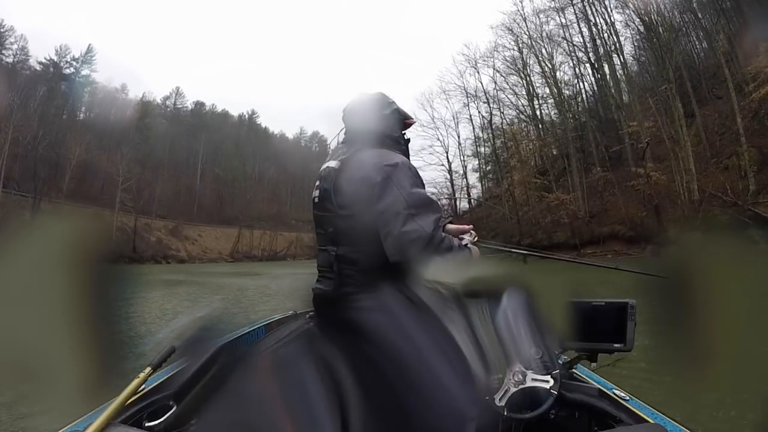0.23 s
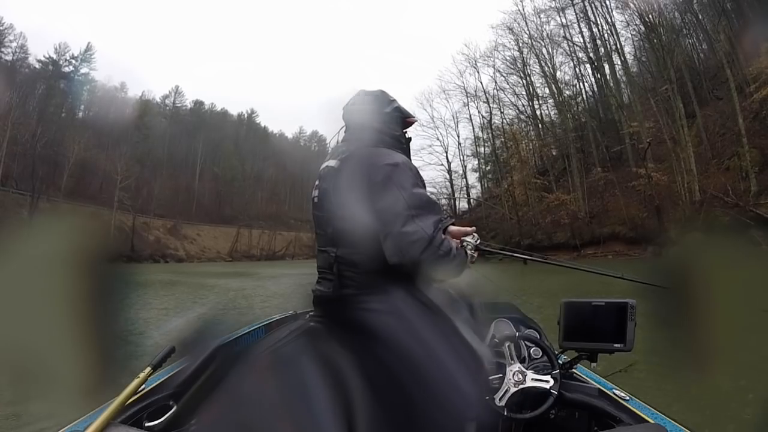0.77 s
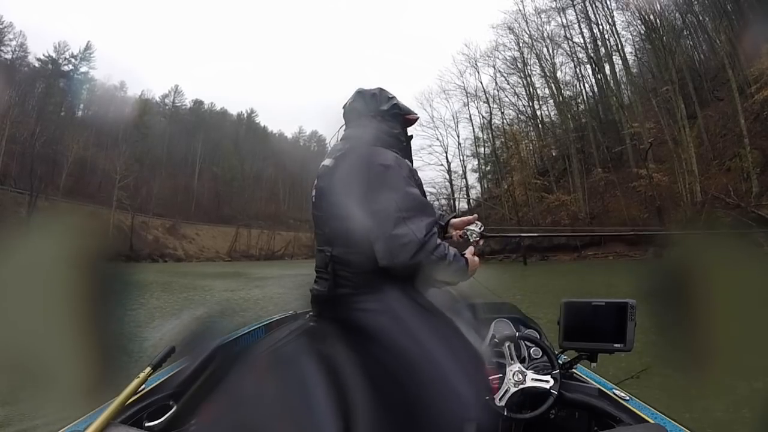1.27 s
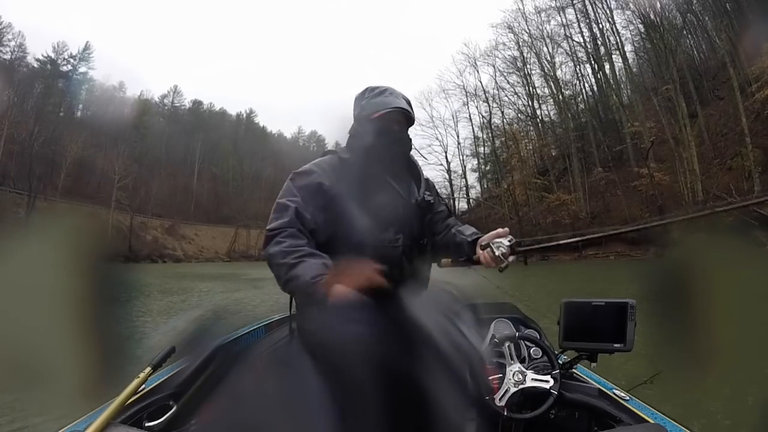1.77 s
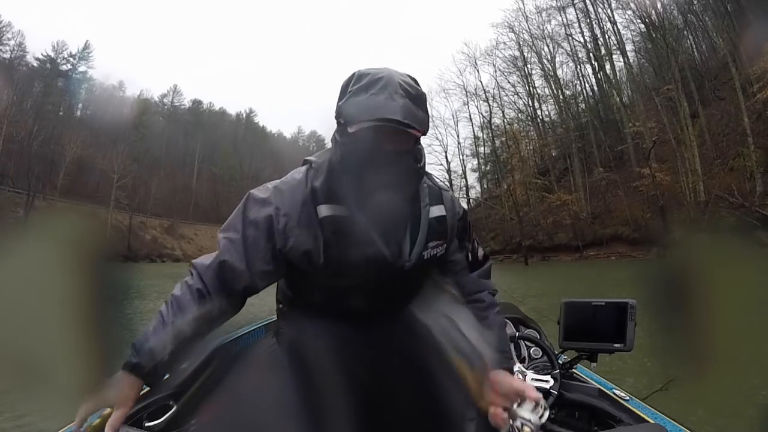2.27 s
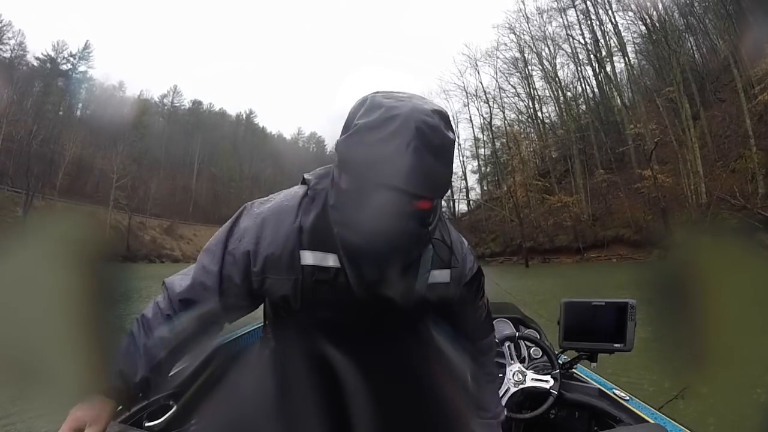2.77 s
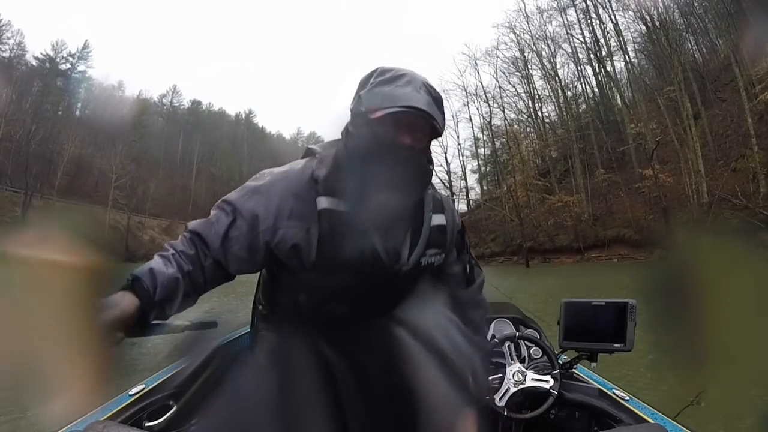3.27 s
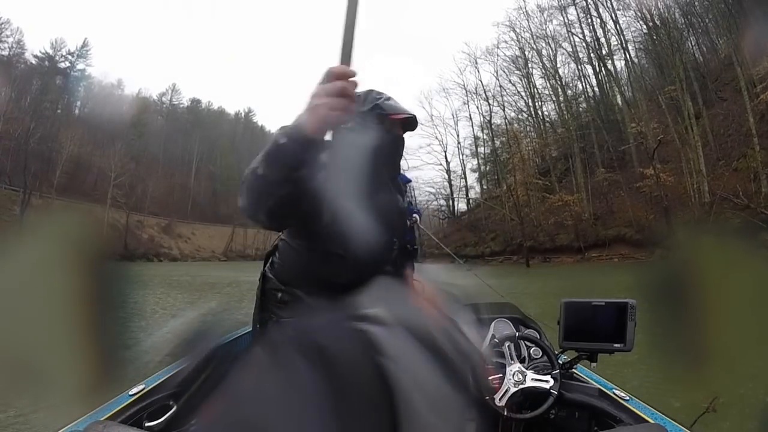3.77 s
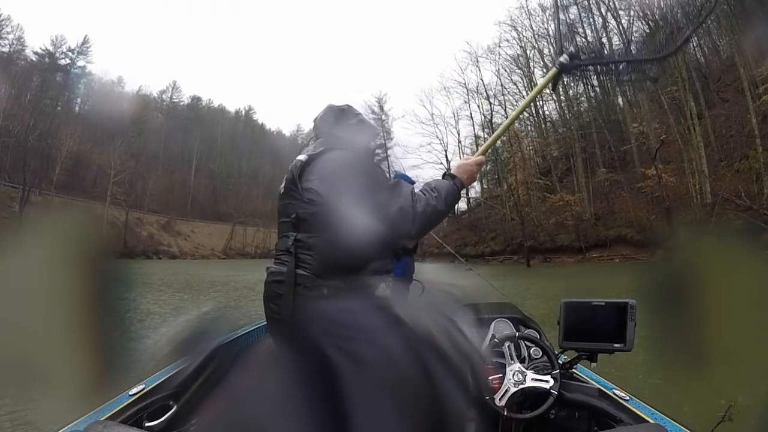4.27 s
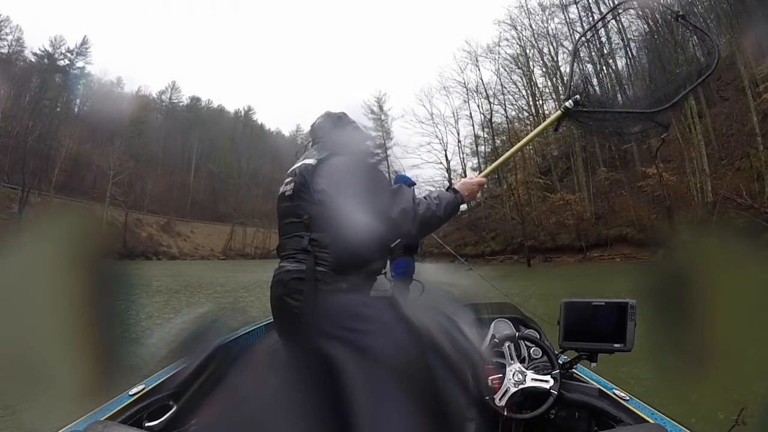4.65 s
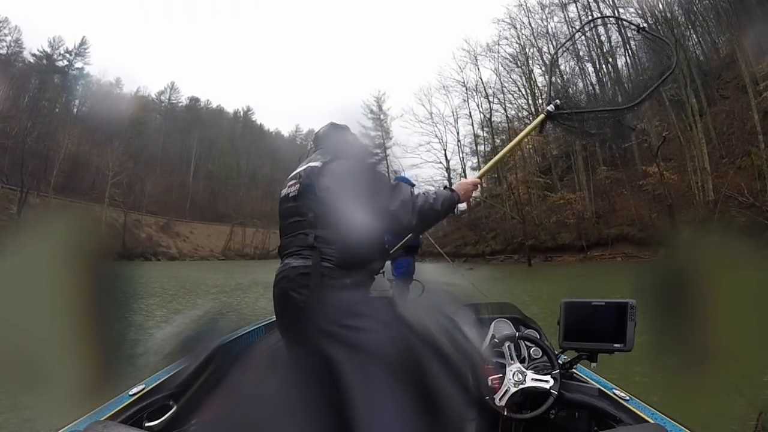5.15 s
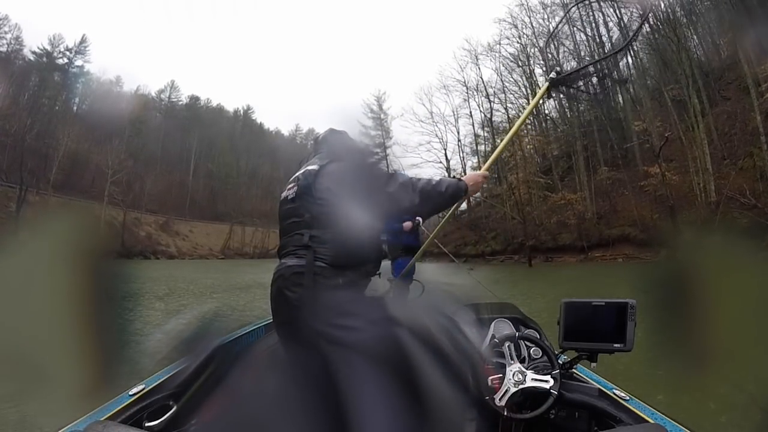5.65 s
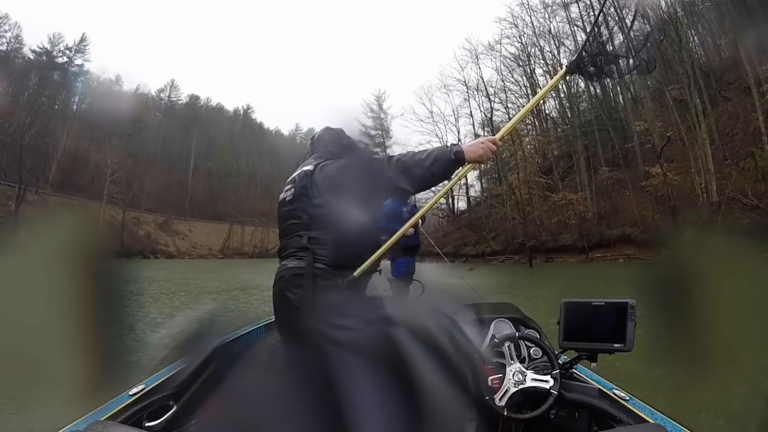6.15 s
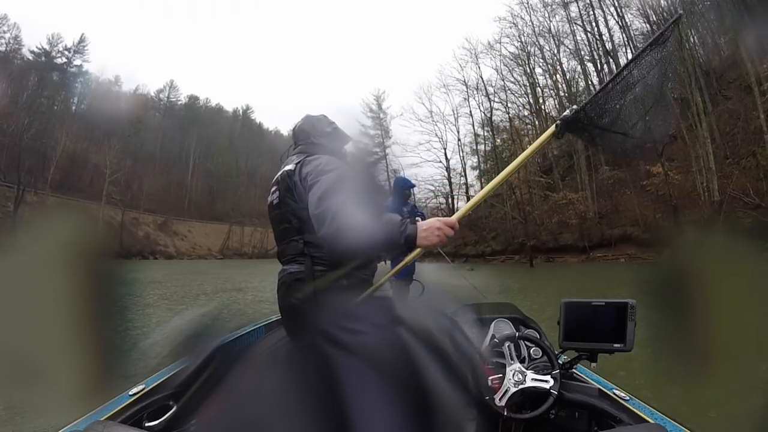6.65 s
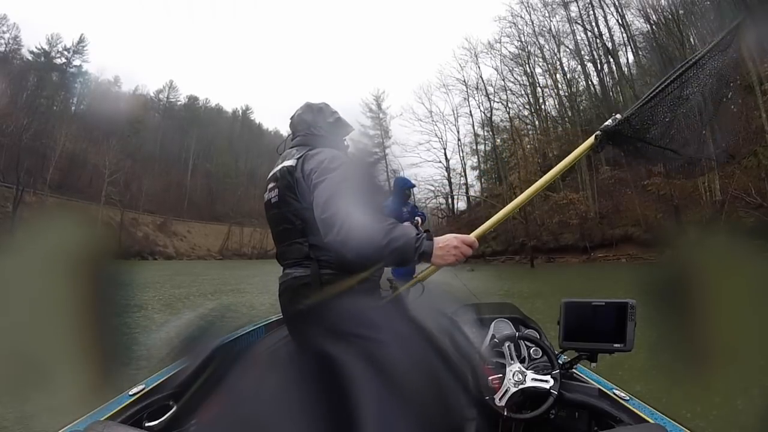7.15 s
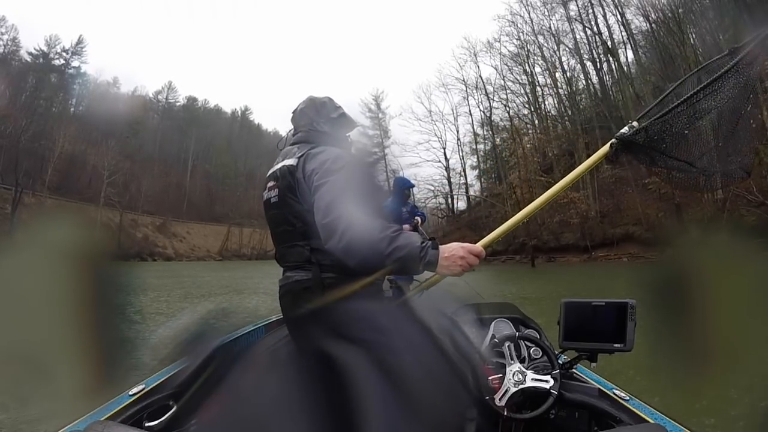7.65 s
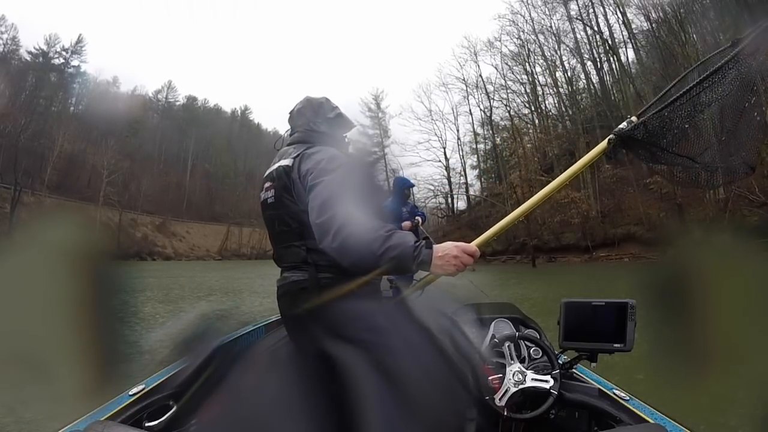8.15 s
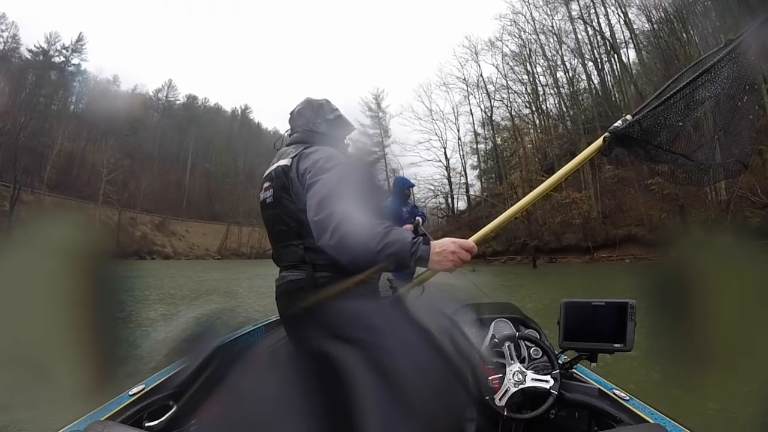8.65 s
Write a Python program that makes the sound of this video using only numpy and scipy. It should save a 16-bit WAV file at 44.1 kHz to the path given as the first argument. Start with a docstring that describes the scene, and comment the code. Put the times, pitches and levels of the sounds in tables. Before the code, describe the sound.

Heard from inside a plastic case on a small fishing boat: an even, muffled hiss of rain on water with dull fine ticking. One very loud drop pops on the case at about 1.5 seconds. Near 2.6 a metal net handle clinks, then thumps and rattles off the deck just after 3. A nylon jacket rustles, and afterwards close drops tap ever more often.

```python
"""A fishing boat on a lake in the rain, heard from a camera in a plastic case on board.
The rain is shaped noise under random ticks; drops on the case and the deck fittings are damped modes and spray.
Bubbles chirp at the hull, a nylon jacket swishes as swelling noise, and blows excite the modes of the hull.
A landing net is pulled off the deck: noisy contacts of its metal handle drive a bank of resonances.
Faint steady tones come from the camera, whose gain control ducks at the hardest drop."""
import sys
import numpy as np
from scipy import signal
from scipy.fft import rfft, irfft, next_fast_len
from scipy.io import wavfile
from scipy.ndimage import uniform_filter1d, minimum_filter1d, map_coordinates

SR = 44100
rng = np.random.default_rng(int(sys.argv[2]) if len(sys.argv) > 2 else 0)


def transcribe(signal):
    """Save signal, clipped to [-1, 1], as a 16-bit WAV file at the path in sys.argv[1]."""
    frames = np.atleast_2d(signal).T
    limited = np.clip(frames, -1, 1)
    pcm = np.round(limited * 32767).astype(np.int16)
    wavfile.write(sys.argv[1], SR, pcm)


N = 392931


def amp(db):
    """Logarithmic level: decibels to an amplitude factor."""
    return 10 ** (np.asarray(db) / 20)


def unit(x):
    """Mean power: x scaled to rms 1."""
    return x / np.sqrt(np.mean(x ** 2) + 1e-20)


def burst(x):
    """Equal energy: x scaled to the energy of 5 ms at rms 1."""
    return x * np.sqrt(0.005 * SR / (np.sum(x ** 2) + 1e-20))


def wobble(rate_hz):
    """Band-limited fluctuation: a smooth curve through rate_hz random knots a second."""
    knots = rng.standard_normal(int(N * rate_hz / SR) + 4)
    return map_coordinates(knots, [np.arange(N) * rate_hz / SR])


def filtered(x, response):
    """Linear filtering: the spectrum of x times a response given as a function of frequency."""
    size = next_fast_len(len(x) + 8192)
    spectrum = rfft(x, size) * response(np.fft.rfftfreq(size, 1 / SR))
    return irfft(spectrum, size)[:len(x)]


def coloured(x, colour):
    """Spectral shaping: x filtered by (frequency [Hz], level [dB]) points, then scaled to rms 1."""
    points_hz, db = np.transpose(colour)
    return unit(filtered(x, lambda hz: amp(np.interp(np.log(hz + 1), np.log(points_hz), db))))


def noise(colour, size):
    """Stationary random sound: coloured Gaussian noise of rms 1."""
    return coloured(rng.standard_normal(size), colour)


def fade(t, t60):
    """Free exponential decay: down 60 dB after t60 seconds."""
    return np.exp(-np.log(1000) * t / t60)


def ring(modes, t, scatter_db):
    """Modal superposition: damped sines of random strength, alternate modes in opposite polarity."""
    total = np.zeros(len(t))
    for k, (hz, db, t60) in enumerate(modes):
        strength = amp(db + scatter_db * rng.standard_normal())
        total += (-1) ** k * strength * np.sin(2 * np.pi * hz * t) * fade(t, t60)
    return total


def add(track, s, sound):
    """Superposition: mix a sound into the track at time s."""
    part = track[max(round(s * SR), 0):][:len(sound)]
    part += sound[:len(part)]


# spectrum of rain on the lake, through the case: (frequency [Hz], relative level per Hz [dB])
LAKE_SPECTRUM = [(20, -5.5), (45, -3), (130, -4.5), (205, -8.5), (260, -4.5), (300, -4), (390, 3.5),
                 (550, -9.5), (800, -11), (980, -19), (1170, -12.5), (1430, -21), (2000, -15),
                 (2900, -13.5), (3400, -18), (4000, -19), (5000, -32), (8000, -37), (12000, -42.5),
                 (15000, -48), (16000, -70)]


def lake(rain_db=-49, swell_db=0.12, flutter_db=0.9):
    """Incoherent summation: countless far drops merge into noise with slow swells and quick flutter."""
    level_db = rain_db + swell_db * wobble(0.83) + flutter_db * wobble(24)
    return amp(level_db) * noise(LAKE_SPECTRUM, N)


# spectrum of small drops, through the case: (frequency [Hz], relative level per Hz [dB])
TICK_SPECTRUM = [(150, -9), (400, 2), (800, 2), (1200, 4.5), (1450, -11.5), (2000, -4), (2900, -1),
                 (4500, -15.5), (11000, -36.5), (16000, -50)]


def patter(level_db=-55, spread_db=3.0, t60=0.027, count=480):
    """Random impulses: small drops tick dully on the boat and the water beside it, few of them loud."""
    out, t = np.zeros(N), np.arange(SR // 25) / SR
    for when, size in rng.random((count, 2)):
        tick = burst(rng.standard_normal(len(t)) * fade(t, t60))
        add(out, when * N / SR, amp(level_db - spread_db * np.log(size + 0.015)) * tick)
    return np.std(out) * coloured(out, TICK_SPECTRUM)  # the colour leaves the overall level unchanged


# faint steady tones of the camera: (frequency [Hz], rms level [dB])
WHINE_TONES = [(258, -63.5), (642, -68.5), (7600, -86), (12048, -88.5)]


def whine():
    """Sinusoidal emission: the camera's electronics hum and whistle, their phases wandering a little."""
    t, out = np.arange(N) / SR, np.zeros(N)
    for hz, db in WHINE_TONES:
        phase = 2 * np.pi * hz * t + 0.5 * wobble(5)
        out += amp(db) * np.sqrt(2) * np.sin(phase)
    return out


# modes of the whole case, shared by all drops: (frequency [Hz], relative level [dB], t60 [s])
CASE_MODES = [(317, -26, 0.058), (430, -26, 0.013), (650, -37, 0.016), (1350, -17.5, 0.014),
              (1907, -33.5, 0.046), (2160, -32, 0.021), (2344, -20, 0.02), (2863, -19, 0.015),
              (3935, -30.5, 0.02)]
# spectrum of the spray of a bursting drop: (frequency [Hz], relative level per Hz [dB])
SPLASH_SPECTRUM = [(100, -40), (500, -1), (2500, 2), (3600, 8), (4700, 0), (6000, -0.5), (8500, -8),
                   (11000, -20), (15000, -29), (17000, -57)]
# modes near the pitch of the struck spot ring more strongly
NEAR_MODE_DB, NEAR_MODE_OCTAVES = 8.5, 0.3
# the film of water shifts the modes from drop to drop: standard deviation [octaves]
WET_DETUNE_OCTAVES = 0.043


def case_modes(spot_hz):
    """Mode coupling: modes near the pitch of the struck spot are favoured and all are slightly detuned."""
    modes = []
    for hz, db, t60 in CASE_MODES:
        nearness = np.exp(-(np.log2(hz / spot_hz) / NEAR_MODE_OCTAVES) ** 2)
        wet_hz = hz * 2 ** (WET_DETUNE_OCTAVES * rng.standard_normal())
        modes.append((wet_hz, db + NEAR_MODE_DB * nearness, t60))
    return modes


def drop(hz, t60, tilt_db, edge_hz=1100, soft_hz=3300, case_db=-2.5, contact=0.0014, wall_share=0.39,
         spray_t60=0.0048, mist_db=-20, mist_t60=0.013):
    """Impact excitation: a drop makes the case wall ring (pock) and bursts into noise (spray)."""
    t = np.arange(SR // 16) / SR
    flatten = 1 - fade(t, contact)  # the drop takes a moment to flatten
    spot = np.sin(2 * np.pi * hz * t) * fade(t, t60) * flatten
    # the small stiff wall passes little below its first resonance, the soft drop little above a few kHz
    band = signal.butter(2, [edge_hz, max(hz, soft_hz)], "bandpass", fs=SR, output="sos")
    spot = signal.sosfilt(band, spot)
    pock = spot + amp(case_db) * ring(case_modes(hz), t, scatter_db=3) * flatten
    # the blow also runs around the case and arrives again a moment later, by a new path each time
    late = rng.uniform(0.00121, 0.00196)
    pock = burst(pock + wall_share * np.interp(t - late, t, pock, left=0))
    # a sharp burst, then a brief fizz of fine droplets; the tilt acts above 4 kHz
    colour = [(f, db + tilt_db * np.log2(max(f / 4000, 1))) for f, db in SPLASH_SPECTRUM]
    spray_decay = fade(t, spray_t60) + amp(mist_db) * fade(t, mist_t60)
    spray = burst(noise(colour, len(t)) * spray_decay * flatten)
    return pock, spray


# drops on the case: (time [s], pock level over 5 ms [dB], pitch of the struck spot [Hz],
# spray level over 5 ms [dB], spray tilt above 4 kHz [dB per octave])
CASE_DROPS = [(.158,-37,1730,-41.5,-3), (.243,-25.5,2230,-43.5,5), (1.566,-2.5,2298,-17,8.5),
              (1.7634,-42.5,2380,-38,8.5), (2.2258,-38,1930,-50.5,2), (2.4473,-46,2600,-30.5,-1.5),
              (2.469,-22.5,1740,-65,-8), (2.51,-31,1910,-40.5,5), (2.9093,-12.5,2336,-25.5,1),
              (2.933,-35.5,2080,-40,-7), (3.9641,-23,2130,-35.5,-4.5), (4.726,-37,1690,-40,-25),
              (4.8895,-32.5,2150,-44.5,-3), (5.2862,-38,2200,-46,1), (5.6785,-30.5,1830,-44.5,-1),
              (6.1031,-16.5,1680,-25.5,-4.5), (6.264,-28,1770,-47,9), (6.5103,-21.5,1920,-38,-4),
              (6.6396,-18.5,2230,-24.5,-0.5), (6.674,-30,2270,-46.5,7), (6.89,-13,2020,-20.5,5),
              (6.962,-44,2600,-43.5,-8), (7.4466,-11.5,1850,-33,8), (7.581,-14.5,1970,-34,7),
              (7.6104,-52,5800,-51,-5), (7.6636,-43.5,1290,-48.5,13), (7.728,-25.5,1930,-32,-8),
              (8.0842,-22,1760,-51,12), (8.2279,-29.5,2000,-27,0), (8.2306,-23,5740,-41,0),
              (8.239,-36,5600,-55,0), (8.2493,-29,1950,-26.5,-3), (8.2707,-49,2820,-44,-5),
              (8.528,-22,1710,-27.5,-12)]
# the wall rings longest when struck near its main resonance: (pitch of the spot [Hz], t60 [s])
SPOT_DECAY = [(1600, .005), (2000, 0.006), (2350, 0.013), (5800, 0.0074)]


def near_drops():
    """Local resonance: big drops hit the case, each at a spot whose pitch sets how long it rings."""
    out = np.zeros(N)
    for s, pock_db, hz, spray_db, tilt_db in CASE_DROPS:
        t60 = np.interp(hz, *np.transpose(SPOT_DECAY))
        pock, spray = drop(hz, t60, tilt_db)
        add(out, s, amp(pock_db) * pock + amp(spray_db) * spray)
    return out


def stray_drops(count=9, level_db=-47.5, spread_db=3, low_hz=1410, high_hz=2600):
    """Random arrivals: faint drops on the fittings, as (time [s], level [dB], centre [Hz])."""
    drops = []
    for when, size, spot in rng.random((count, 3)):
        db = level_db + spread_db * (2 * size - 1)
        drops.append((when * N / SR, db, low_hz * (high_hz / low_hz) ** spot))
    return drops


# drops on the deck fittings: (time [s], ringing level over 5 ms [dB], centre of the strongest ringing [Hz])
FITTING_DROPS = [(0.2073,-42.5,1200), (1.406,-43.5,1940), (2.051,-28,2670), (2.162,-32.5,1600),
                 (2.2873,-39,1390), (2.5735,-40.5,2780), (4.022,-38.5,2170), (4.1123,-37.5,1320),
                 (4.158,-33,2340), (5.4254,-44,1800), (5.496,-37.5,1630), (5.821,-30.5,2720),
                 (5.8337,-33.5,2800), (7.795,-41.5,1610), (8.3222,-33,2170), (8.866,-39.5,1900)]
# modes of the fittings: (frequency [Hz], relative level [dB], t60 [s])
FITTING_MODES = [(795, 6, 0.056), (1160, 10.5, 0.017), (1575, -4, 0.022), (1910, 4, 0.018),
                 (2320, 12, 0.0046), (2833, 2.5, 0.022)]


def deck_drops(focus_db=18, spray_db=-25, spray_t60=0.0047):
    """Selective modal excitation: a fitting rings most strongly near the centre of each drop."""
    out, t = np.zeros(N), np.arange(SR // 16) / SR
    for s, level_db, centre in [*FITTING_DROPS, *stray_drops()]:
        # focus_db is lost for each octave away from the centre
        modes = [(hz, db - focus_db * abs(np.log2(hz / centre)), t60) for hz, db, t60 in FITTING_MODES]
        plink = burst(ring(modes, t, scatter_db=2) * (1 - fade(t, 0.011)))
        spray = burst(noise(SPLASH_SPECTRUM, len(t)) * fade(t, spray_t60))
        add(out, s, amp(level_db) * (plink + amp(spray_db) * spray))
    return out


# wavelets lapping at the hull: (time [s], relative level [dB], middle bubble pitch at the start [Hz])
WAVELETS = [(.26, -53, 800), (.89, -41.5, 680), (.905, -49, 930), (1.2, -45, 770), (2.035, -42, 1096),
            (3.042, -40, 406), (6.02, -52, 646)]


def lapping(level_db=-3.5, rise=0.83, t60=0.019, spread=0.02, count=3):
    """Bubble resonance: each wavelet traps a few bubbles, whose pitch rises as they surface."""
    out, t = np.zeros(N), np.arange(SR // 10) / SR
    for s, db, hz in WAVELETS:
        for delay, size in rng.random((count, 2)):
            bubble_hz = hz * 2 ** (0.55 * (size - 0.5))
            phase = 2 * np.pi * bubble_hz * (t + rise * t * t)
            bubble = burst(np.sin(phase) * fade(t, t60) * (1 - fade(t, 0.008)))
            add(out, s + spread * delay, amp(db + level_db) * bubble)
    return out


# strokes of the rain jacket: (time of the peak [s], rise [s], fall [s],
# relative level of the cloth's flap [dB], relative level of its surface hiss [dB])
STROKES = [(1.4, 0.78, 0.4, -60, -65), (2.75, 0.85, 1.2, -49, -67.5), (4.07, 0.91, 0.57, -50.5, -66),
           (4.66, 0.23, .28, -59, -52.5), (4.745, 0.15, 0.12, -40.5, -55), (5.148, 0.0065, 0.027, -52, -43),
           (5.6, .4, 0.56, -58, -62), (6.86, .08, 0.18, -47, -61.5)]
# spectrum of flapping cloth: (frequency [Hz], relative level per Hz [dB])
FLAP_SPECTRUM = [(100, -14), (280, 4), (750, -5), (1400, -23.5), (3000, -10), (6000, -48)]
# spectrum of sliding nylon: (frequency [Hz], relative level per Hz [dB])
NYLON_SPECTRUM = [(1000, -8), (3000, 12.5), (5000, -3), (7200, -2.5), (8800, -12), (12000, -16),
                  (15000, -33)]


def jacket(crinkle_db=2.0, depth_db=20):
    """Friction noise: wet nylon flaps and slides, each stroke gaining and losing depth_db per rise and fall."""
    t, flap, hiss = np.arange(N) / SR, 0, 0
    for s, rise, fall, flap_db, hiss_db in STROKES:
        stroke_db = -depth_db * np.maximum((s - t) / rise, (t - s) / fall)
        # strokes that overlap add in power
        flap = np.hypot(flap, amp(flap_db + stroke_db))
        hiss = np.hypot(hiss, amp(hiss_db + stroke_db))
    cloth = flap * noise(FLAP_SPECTRUM, N) + hiss * noise(NYLON_SPECTRUM, N)
    return amp(crinkle_db * wobble(70)) * cloth


# blows on the hull and deck: (time [s], relative level [dB], hardness [0 booms, 1 knocks, 2 clacks])
BLOWS = [(1.4515, -27, 1.85), (2.645, -36.5, 1.7), (2.691, -41, .9), (2.73, -38, 0.88), (3.137, -16, 0.4),
         (3.139, -30.5, 2.3), (3.171, -31, 0), (3.199, -33, 0.001), (3.291, -38, 0.47), (3.363, -40, 1.1),
         (3.403, -35, 1.27), (3.484, -40, 1.25), (3.582, -31, 0.073), (3.623, -40, .8), (3.932, -39, 0.62),
         (4.113, -42, 0), (4.14, -41.5, 1.34)]
# hull modes in three groups, deep to hard: (frequency [Hz], relative level [dB], t60 [s])
BOOM_MODES = [(48.3, -10, 0.049), (73, -2, 0.053), (97, 2, 0.038), (102.2, 0, 0.063)]
KNOCK_MODES = [(209, -2.5, 0.058), (247, -1, 0.06), (293, -1, 0.094), (356, 1, 0.069), (410, 6.5, 0.027),
               (466, -7, 0.035)]
CLACK_MODES = [(403, -4.5, 0.16), (738, -4, 0.088), (900, -8, 0.073), (1110, 1.5, .03), (1340, 0.5, 0.029),
               (1880, 2.5, 0.039), (2130, -3.5, 0.057), (2880, -6.5, 0.023)]
# how much weaker a group rings for each step of hardness away from its own
HARDNESS_FOCUS_DB = 22.5


def hull(level_db=2, lowest_hz=42, scatter_db=1):
    """Contact hardness: feet and gear strike the boat; soft heavy blows boom, hard light ones clack."""
    out, t = np.zeros(N), np.arange(SR // 4) / SR
    groups = (BOOM_MODES, KNOCK_MODES, CLACK_MODES)
    for s, db, hardness in BLOWS:
        shares = amp(-HARDNESS_FOCUS_DB * np.abs(hardness - np.arange(len(groups))))
        shares = shares / np.linalg.norm(shares)  # powers sum to 1
        for share, modes in zip(shares, groups):
            add(out, s, share * amp(db + level_db) * burst(ring(modes, t, scatter_db)))
    return signal.sosfilt(signal.butter(2, lowest_hz, "highpass", fs=SR, output="sos"), out)


# the net handle strikes the deck and bounces once: (time [s], relative level [dB], flight before the bounce [s])
STRIKES = [(2.646, -19, 0.04), (2.688, -34.5, 0.023), (2.738, -36, 0.057), (2.856, -36.5, 0.0098),
           (3.137, -30, 0.028), (3.171, -28.5, .01), (3.191, -38, 0.0092), (3.2248, -29, 0.017),
           (3.565, -40.5, 0.0099)]
# resonances of the handle: (frequency [Hz], width [Hz], relative level [dB])
HANDLE_RESONANCES = [(1160, 110, 4.5), (1770, 18, 8.5), (2020, 300, -4), (2290, 37, -1), (2640, 64, 1.5),
                     (3040, 150, 7.5), (3380, 41, -7), (4370, 64, -3), (4140, 30, -24), (4470, 25, -15),
                     (7350, 45, -19), (8590, 490, -31)]
# spectrum of metal scraping on the deck: (frequency [Hz], relative level per Hz [dB])
SCRAPE_SPECTRUM = [(150, -12), (350, 6.5), (800, -8.5), (1200, 2), (1600, -6), (3000, 4), (4600, -0.5),
                   (5600, -21), (7500, -13.5), (10000, -27), (15000, -46)]
# a long flight leaves a weaker bounce
RATTLE_T60_S, BOUNCE_LOSS_DB_PER_S = 0.053, 303


def handle_response(f):
    """Resonance: a bank of second-order band-pass responses, alternate ones in opposite polarity."""
    total = 0
    for k, (centre, width, db) in enumerate(HANDLE_RESONANCES):
        damping = 1j * f * width
        total = total + (-1) ** k * amp(db) * damping / (centre * centre - f * f + damping)
    return total


def net_handle(ring_db=-3, scrape_db=-3.0, chatter_db=4.5, tail_db=-20, tail_t60=0.1):
    """Source and resonator: noisy contacts of the tube with the deck scrape and drive its resonances."""
    contacts, t = np.zeros(N), np.arange(SR // 4) / SR
    # the slow faint tail is the hoop left buzzing
    decay = fade(t, RATTLE_T60_S) + amp(tail_db) * fade(t, tail_t60)
    for s, db, flight in STRIKES:
        for wait in (0, flight):
            scrape = burst(noise(SCRAPE_SPECTRUM, len(t)) * decay * (1 - fade(t, 0.0025)))
            add(contacts, s + wait, amp(db - BOUNCE_LOSS_DB_PER_S * wait) * scrape)
    contacts = contacts * amp(chatter_db * wobble(350))  # the tube skips while it touches
    tube = np.std(contacts) * unit(filtered(contacts, handle_response))
    return amp(scrape_db) * contacts + amp(ring_db) * tube


def scene():
    """Linear superposition: everything that reaches the microphone."""
    rain = lake() + patter() + near_drops() + deck_drops()
    boat = lapping() + jacket() + hull() + net_handle()
    return (rain + boat + whine())[None]


def gain_control(x, release_db=22):
    """Peak limiting: gain drops for peaks above full scale, then returns at release_db a second."""
    over_db = 20 * np.log10(np.maximum(np.abs(x), 1))
    slope = release_db * np.arange(N) / SR
    gain_db = slope - np.maximum.accumulate(over_db + slope)
    # the gain starts down just before the peak and moves smoothly
    return x * amp(uniform_filter1d(minimum_filter1d(gain_db, size=129), size=129))


def record(dry, top_hz=16300):
    """Band limitation: the camera's limiter, then nothing from top_hz upward."""
    return filtered(gain_control(dry[0]), lambda hz: hz < top_hz)[None]


dry = scene()
out = record(dry)
transcribe(out)
```